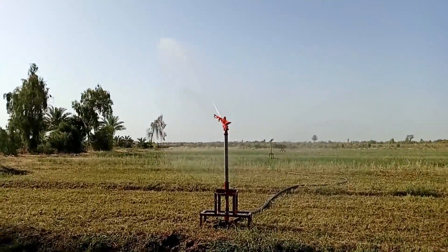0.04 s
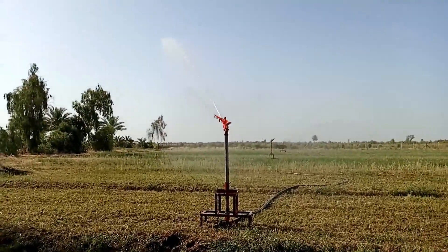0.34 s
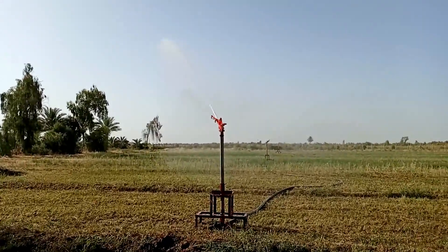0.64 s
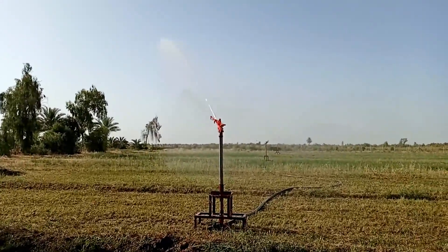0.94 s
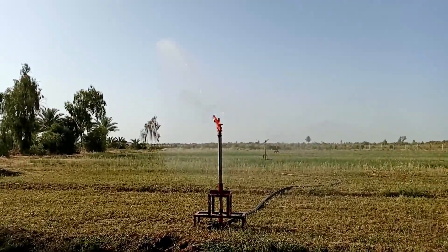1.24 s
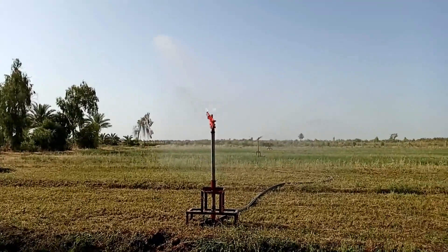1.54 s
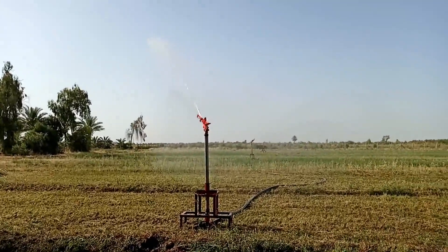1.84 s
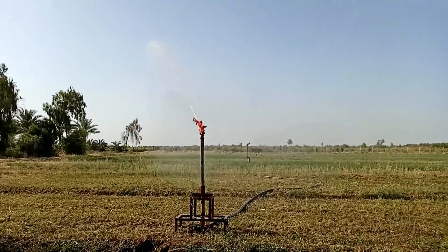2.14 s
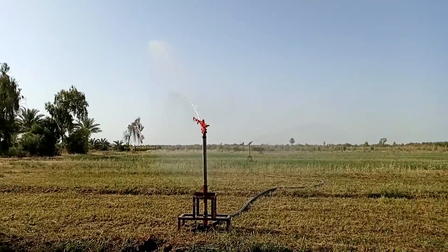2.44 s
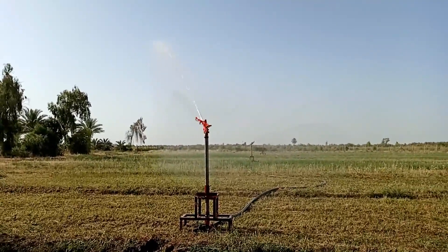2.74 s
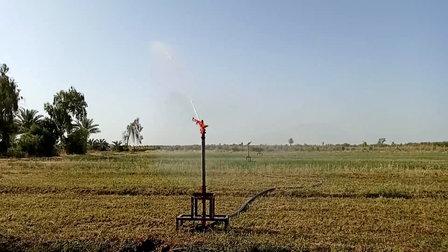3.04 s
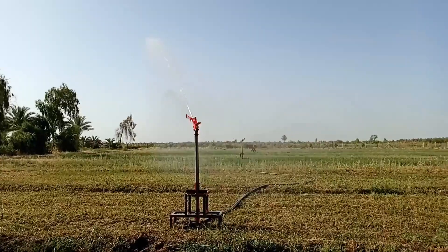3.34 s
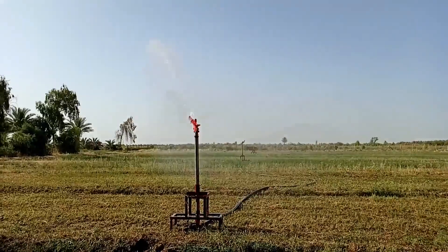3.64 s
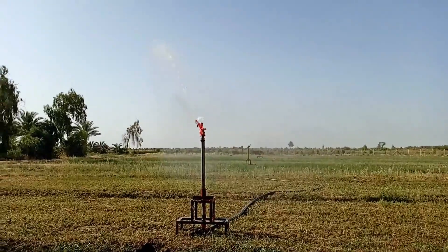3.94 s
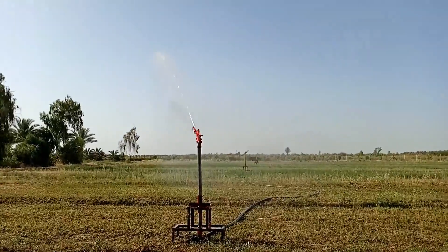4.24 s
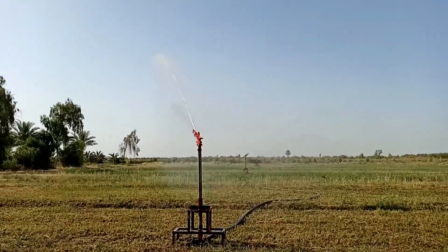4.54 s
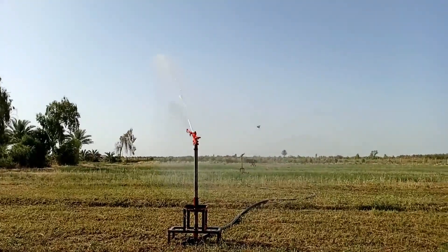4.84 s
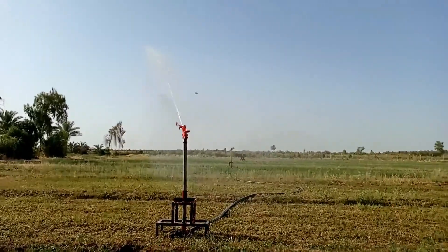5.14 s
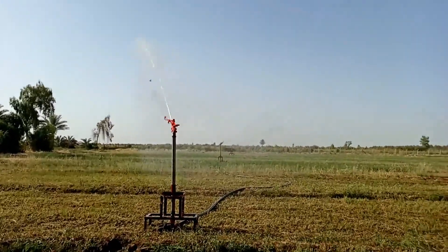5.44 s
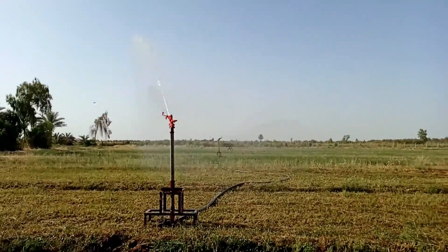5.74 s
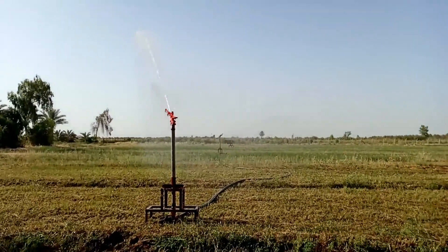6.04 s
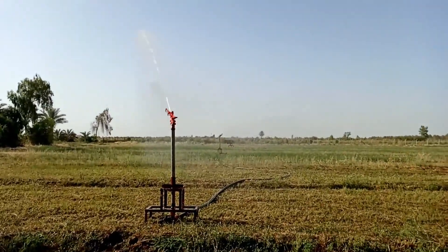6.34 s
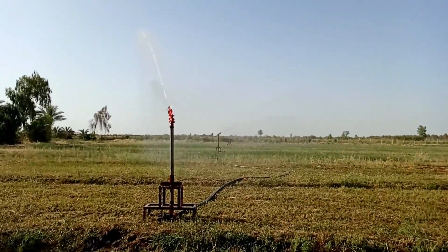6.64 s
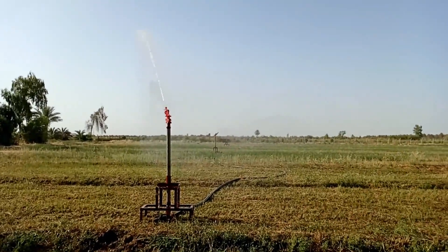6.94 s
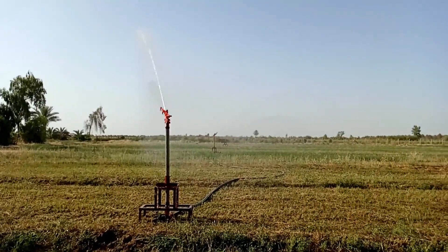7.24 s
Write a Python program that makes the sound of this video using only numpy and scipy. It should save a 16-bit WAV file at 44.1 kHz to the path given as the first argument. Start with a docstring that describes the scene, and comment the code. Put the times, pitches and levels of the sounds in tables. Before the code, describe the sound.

Outdoors in a grassy field, a sprinkler arm chops through a hissing water jet about three times a second, each time with a sharp splash, a short metallic knock and a low pipe thud. A more distant sprinkler ticks at a slightly slower pace. Soft spray swells and fades, with occasional drops on dry grass. In the second half, gentle wind puffs on the microphone and a very faint hum joins a distant rumble.

```python
"""A large impact sprinkler on a steel stand waters an open field, about three strokes a second.
On each stroke its arm dips into the jet with a hiss, slaps back out and knocks on the sprinkler head,
while the kicks of the water make the upright pipe thud. The jet hisses steadily, a wash of spray comes
and goes, and stray drops fall. Further off are a second, ticking sprinkler, a dull rumble and a faint
hum. From about halfway, a breeze buffets the microphone."""
import sys
import numpy as np
from scipy import signal
from scipy.fft import rfft, irfft
from scipy.io import wavfile
from scipy.ndimage import uniform_filter1d

SR = 44100
rng = np.random.default_rng(int(sys.argv[2]) if len(sys.argv) > 2 else 0)


def master(y):
    """Save y as 16-bit WAV."""
    cut = np.clip(np.atleast_2d(y).T, -1, 1)
    pcm = np.round(cut * 32767)  # scale
    wavfile.write(sys.argv[1], SR, pcm.astype(np.int16))


N = 330309
TIME = np.arange(N) / SR

# each stroke of the arm: leave_jet_s, entry_hiss_db, knock_db
ARM_STROKES = [(.012, -33.5, -28.5), (.350, -31.5, -28), (0.69, -34.5, -30.5), (1.023, -31.5, -28.5),
               (1.363, -36, -33), (1.699, -33, -31), (2.039, -35, -30), (2.373, -32, -29.5),
               (2.716, -33, -29), (3.055, -31.5, -29), (3.394, -33, -29), (3.734, -30.5, -28.5),
               (4.07, -31.5, -28.5), (4.411, -34.5, -29), (4.746, -33.5, -32.5), (5.086, -28.5, -33),
               (5.424, -32, -29), (5.763, -36.5, -29), (6.101, -32, -32.5), (6.439, -32, -29),
               (6.775, -34.5, -29.5), (7.111, -34, -30.5), (7.448, -32.5, -26.5)]
# the tone of a splash, from low to high: pitch_hz, level_db
SPLASH_TONE = [(60, -28), (200, -8), (340, -5.5), (520, -23.5), (790, 1.5), (1500, -0.5), (2300, -4.5),
               (2950, -8.5), (4400, -3), (5150, -11), (6600, 1.5), (7700, -1), (9300, -15.5), (13300, -16),
               (15500, -6)]
# narrow peaks and dips that colour the tone of each splash: pitch_hz, width_hz, lift_db
SPLASH_PEAKS = [(370, 164, 9), (838, 180, 1.5), (1058, 75, -12.5), (1145, 180, 5.5), (1360, 58, -2),
                (1584, 240, 9), (2216, 165, 8), (2365, 120, -2), (2538, 260, 2.5), (3080, 64, 6),
                (3300, 100, -2.5), (3516, 320, 6), (4150, 110, 7), (4590, 140, 10), (5500, 180, 4),
                (5900, 310, 4), (6220, 105, -14.5), (6570, 340, 2.5), (7400, 140, 3), (7350, 38, -0.5),
                (10890, 1900, 8)]
# the notes the head rings with when the arm hits it: pitch_hz, level_db, ring_s
HEAD_NOTES = [(870, -11.5, 0.051), (1094, -6.5, 0.11), (1185, 2.5, 0.044), (1426, 1, 0.048),
              (1500, 0, 0.024), (1740, -2, 0.033), (2310, -8, 0.075), (2384, -13.5, 0.087),
              (2510, 1, 0.057), (4430, 0, 0.016)]
# the low notes of the pipe that feeds the head: pitch_hz, level_db, ring_s
PIPE_NOTES = [(78.6, -20, 0.071), (94, -20, 0.11)]
# the tone of the jet: pitch_hz, level_db
JET_TONE = [(40, -32), (130, -21), (280, -16), (450, -20), (700, -13), (900, -7.5), (1500, 1), (2800, -16),
            (4400, -3), (5200, -11.5), (7200, -1.8), (9200, -14.5), (13300, -18.3), (15400, -10.5)]
# broad humps in the jet's hiss: pitch_hz, width_hz, lift_db
JET_PEAKS = [(1210, 140, 0.5), (1570, 320, 2), (2170, 270, 5), (3540, 240, 3.5), (5900, 200, 3),
             (8000, 670, 2), (11070, 1300, 6.5)]
# the tone of the wash of spray: pitch_hz, level_db
WASH_TONE = [(100, -16), (270, -0.5), (520, -9.5), (660, -16), (1100, 0), (1600, 1), (2600, -1), (3400, -3),
             (4400, -3), (5200, -10), (6000, -6), (9000, -16), (15000, -20)]
# the biggest stray drops on dry grass: start_s, level_db, pitch_hz
BIG_DROPS = [(3.812, -43, 1480), (5.168, -42.5, 5100), (5.868, -42.5, 1600), (6.224, -43.5, 1450),
             (7.264, -44.5, 4530)]
# the tone of the second sprinkler: pitch_hz, level_db
FAR_TONE = [(100, -7), (280, -6), (450, -21), (900, 1.5), (1500, 1.5), (1850, -8.5), (2300, 1),
            (2800, -8.5), (4200, -4), (5100, -12), (6900, -3), (10000, -19.5), (16000, -30)]
# the strength of the breeze on the microphone: time_s, level_db
BREEZE_LEVELS = [(3.6, -79), (3.76, -60), (4.11, -60), (4.18, -63.5), (4.46, -61), (4.63, -82),
                 (4.68, -50.5), (4.8, -55.5), (5.1, -51.5), (5.3, -67), (5.5, -56), (5.58, -44),
                 (5.86, -50), (6.02, -64), (6.45, -53), (7.06, -47), (7.23, -57), (7.31, -48.5)]
# the tone of the breeze: pitch_hz, level_db
BREEZE_TONE = [(20, -53), (45, -7), (80, 2.5), (120, -5.5), (180, -17.5), (300, -46.5), (700, -62),
               (2000, -73)]
# the tone of the outdoor rumble: pitch_hz, level_db
RUMBLE_TONE = [(60, -22.5), (160, -10.5), (270, -1), (420, -15), (900, -22)]
# the strength of the far-off hum: time_s, level_db
HUM_LEVELS = [(3.5, -86), (4.9, -79), (5.3, -63), (5.7, -72.5), (7.4, -78.5)]

# Every stroke runs the same course: into the jet, out again, onto the stop.
LEAVE_S, ENTRY_DB, KNOCK_DB = np.transpose(ARM_STROKES)
ENTER_S, KNOCK_S = LEAVE_S - 0.035, LEAVE_S + 0.0052
# Base levels, which each layer shifts. A harder entry leaves less water for the sideways sheet.
SHEET_DB, SLAP_DB = -33.5 - 0.7 * (ENTRY_DB - ENTRY_DB.mean()), -28.5


def arm_splashes():
    """The arm cuts the jet, throws a sheet of water sideways and slaps out again; mist hangs behind."""
    entry = bursts(ENTER_S + 0.0016, ENTRY_DB + 4, rise_s=0.0016, hold_s=0.008, fall_s=0.0078)
    fan = bursts(ENTER_S + 0.021, SHEET_DB - 5, rise_s=0.0039, hold_s=0.005, fall_s=0.014)
    slap = bursts(LEAVE_S + 0.0007, SLAP_DB + 3.5, rise_s=0.0019, hold_s=0.0058, fall_s=0.0074)
    sheet = bursts(ENTER_S + 0.017, SHEET_DB + 3, rise_s=0.0068, hold_s=0.0058, fall_s=0.008)
    fling = bursts(KNOCK_S + 0.00039, KNOCK_DB + 0.24, rise_s=0.0021, hold_s=0.001, fall_s=0.013)
    mist = bursts(LEAVE_S + 0.0069, SLAP_DB - 13, rise_s=0.004, hold_s=0.004, fall_s=0.057)
    # the arm's thin edge makes fine, bright spray; the full sheet sounds heavier
    fine = np.sqrt(entry + fan + slap) * spatter(grain_db=3.5, flutter_db=1.94, flutter_hz=247)
    heavy = np.sqrt(sheet + fling + mist) * spatter(grain_db=2.5, flutter_db=2, flutter_hz=200)
    return shape_tone(let_through(fine, "high", 1400, order=1) + heavy, SPLASH_TONE, SPLASH_PEAKS)


def arm_knocks(contacts=4, gap_s=0.001473):
    """The arm lands on its stop in a few quick contacts, each ringing the head's notes unevenly."""
    out = 0
    for note in HEAD_NOTES:
        chance = rng.random((len(KNOCK_S), contacts, 2))
        times = KNOCK_S[:, None] + gap_s * (np.arange(contacts) + chance[..., 0] - 0.5)
        sizes = (2 * chance[..., 1] - 1) * from_db(-2.5 * np.arange(contacts))
        shares = sizes / np.linalg.norm(sizes, axis=1, keepdims=True)   # they share one blow's energy
        push = np.zeros(N)
        push[sample_at(times)] = from_db(KNOCK_DB[:, None] - 2.9) * shares
        out = out + ring(push, [note])
    return out


def pipe_thuds():
    """The water kicks as the arm enters and leaves the jet; the pipe thuds a moment later."""
    push = np.zeros(N)
    for times, db in ((ENTER_S + 0.003, SHEET_DB - 0.5), (LEAVE_S + 0.0084, SLAP_DB + 1.5)):
        late, louder = rng.standard_normal((len(times), 2)).T
        push[sample_at(times + 0.0025 * late)] = from_db(db + 1.7 * louder)
    return let_through(ring(push, PIPE_NOTES), "band", [60, 160])


def jet_hiss(drops_per_s=120):
    """The nozzle hisses, and single drops patter on the field among the spray."""
    hiss = spatter(grain_db=3.5, flutter_db=1, flutter_hz=90) * from_db(0.5 * drift(24))
    patter = (rng.random(N) < drops_per_s / SR) * rng.standard_normal(N)
    spray = unit_level(hiss + from_db(-10.5) * unit_level(patter))
    return from_db(-49.6) * shape_tone(spray, JET_TONE, JET_PEAKS)


def spray_wash(first_s=1.044, every_s=2.349, echo_db=-5):
    """A duller hiss of spray swells and fades at a slow, even pace; its ground echo bends the tone."""
    power = bursts(np.arange(first_s, N / SR, every_s), -49, rise_s=0.13, hold_s=0.21, fall_s=0.21)
    hiss = shape_tone(spatter(grain_db=1.5, flutter_db=1.1, flutter_hz=60), WASH_TONE)
    age_s = (TIME - first_s + every_s / 2) % every_s - every_s / 2
    lag_s = np.abs(0.0055 + 0.00597 * age_s)   # the echo lags as the spray moves on, so the tone falls
    echo = np.interp(TIME - lag_s, TIME, hiss)
    return np.sqrt(power) * unit_level(hiss + from_db(echo_db) * echo)


def stray_drops(count=9, small_db=-48, spread_db=2.5, middle_hz=3500):
    """Each drop is a brief crackle around its own pitch; small ones fall at random among the big ones."""
    small_drops = [(when * N / SR, small_db + spread_db * (2 * size - 1), middle_hz * 2 ** (2 * pitch - 1))
                   for when, size, pitch in rng.random((count, 3))]
    out, noise = 0, rng.standard_normal(N)
    for start_s, db, hz in BIG_DROPS + small_drops:
        crackle = unit_level(let_through(noise, "band", [hz / 1.44, hz * 1.3]))
        power = bursts([start_s], db, rise_s=0.0018, hold_s=0.0045, fall_s=0.004)
        out = out + crackle * np.sqrt(power)
    return out


def far_sprinkler(first_s=0.2322, every_s=0.38279, uneven_db=3):
    """A second sprinkler keeps its own even beat: a hiss swells and ends in a short, dull tick."""
    times = np.arange(first_s, N / SR, every_s)
    tick_db, hiss_db = np.transpose([-35.5, -39.5] + uneven_db * rng.standard_normal((len(times), 2)))
    hiss_power = bursts(times, hiss_db, rise_s=0.022, hold_s=0, fall_s=0.004)
    tick_power = bursts(times, tick_db, rise_s=0.0007, hold_s=0.001, fall_s=0.003)
    hiss = np.sqrt(hiss_power) * spatter(grain_db=3, flutter_db=0, flutter_hz=200)
    tick = np.sqrt(tick_power) * rng.standard_normal(N)
    return shape_tone(let_through(hiss, "high", 1500, order=1) + tick, FAR_TONE)


def breeze(buffet_db=4, buffet_hz=13.5):
    """Moving air buffets the microphone with low, lumpy puffs, setting in about halfway."""
    swirls = shape_tone(rng.standard_normal(N), BREEZE_TONE)
    swirls /= np.sqrt(uniform_filter1d(swirls ** 2, size=2400) + 1e-6)   # even out the loudness
    level_db = np.interp(TIME, *np.transpose(BREEZE_LEVELS))
    return from_db(level_db + buffet_db * np.clip(drift(buffet_hz), -2, 2)) * swirls


def far_rumble_and_hum():
    """A dull outdoor rumble comes and goes; a faint, wavering hum rises in the second half."""
    rumble = shape_tone(rng.standard_normal(N), RUMBLE_TONE)
    hum_hz = 545 + 9 * drift(12.7)
    hum = np.sin(2 * np.pi * np.cumsum(hum_hz) / SR)
    hum_db = np.interp(TIME, *np.transpose(HUM_LEVELS)) + 4 * drift(5.9)
    rumble_db = -68 + 6.6 * drift(3.4)
    return from_db(rumble_db) * rumble + from_db(hum_db) * hum


def spatter(grain_db, flutter_db, flutter_hz):
    """Countless droplets of uneven size (grain), arriving in clumps (flutter)."""
    droplets = rng.standard_normal(N) * from_db(grain_db * np.clip(rng.standard_normal(N), -2, 2))
    return unit_level(droplets * from_db(flutter_db * np.clip(drift(flutter_hz), -2, 2)))


def bursts(times, levels_db, rise_s, hold_s, fall_s):
    """Power over time: each burst grows up to its given moment, holds, then dies away."""
    power = np.zeros(N)
    for peak_s, db in np.broadcast(times, levels_db):
        begin_s, end_s = peak_s - 10 * rise_s, peak_s + hold_s + 10 * fall_s
        span = slice(max(0, int(begin_s * SR)), max(0, int(end_s * SR)))
        age_s = TIME[span] - peak_s
        shape = np.exp(np.minimum(age_s, 0) / rise_s - np.maximum(age_s - hold_s, 0) / fall_s)
        power[span] += (from_db(db) * shape) ** 2
    return power


def ring(push, notes):
    """Each push starts pure notes that fade by 60 dB in their ring_s."""
    out = 0
    for hz, db, ring_s in notes:
        fade, turn = np.exp(-np.log(1000) / (ring_s * SR)), 2 * np.pi * hz / SR
        feedback = [1, -2 * fade * np.cos(turn), fade * fade]
        out = out + from_db(db) * signal.lfilter([0, np.sin(turn)], feedback, push + 1e-18)
    return out


def shape_tone(sound, tone, peaks=(), size=8192):
    """Give a sound a tone with peaks and dips; plain noise keeps its overall power."""
    hz = np.maximum(np.arange(size // 2 + 1) * SR / size, 1)
    tone_hz, tone_db = np.transpose(tone)
    db = np.interp(np.log(hz), np.log(tone_hz), tone_db)
    for pitch_hz, width_hz, lift_db in peaks:
        db = db + lift_db / (1 + (2 * (hz - pitch_hz) / width_hz) ** 2)
    # fold the filter in time so that it rings only after a sound, never before
    folded = irfft(np.log(unit_level(from_db(db))))
    folded[1:size // 2] *= 2
    folded[size // 2 + 1:] = 0
    click_response = irfft(np.exp(rfft(folded)))[:size // 2]
    return signal.fftconvolve(sound, click_response)[:N]


def drift(hz):
    """A smooth random wander, usually between -1 and 1; more hz makes it quicker."""
    memory = np.exp(-40 * np.pi * hz / SR)
    noise = rng.standard_normal(N // 20 + 2002)
    slow = signal.lfilter([1], [1, -2 * memory, memory * memory], noise)[2000:]
    return np.interp(np.arange(N) / 20, np.arange(len(slow)), unit_level(slow))


def let_through(sound, part, hz, order=2):
    """Keep the "high" part of a sound, or one "band" of it."""
    return signal.sosfilt(signal.butter(order, hz, part, fs=SR, output="sos"), sound)


def sample_at(times):
    """Turn seconds into sample positions."""
    return np.clip(times * SR, 0, N - 1).astype(int)


def from_db(db):
    """Turn decibels into a multiplier."""
    return 10 ** (np.asarray(db) / 20)


def unit_level(sound):
    """Scale to an average power of 1."""
    return sound / np.sqrt(np.mean(sound ** 2) + 1e-20)


def scene():
    """Both sprinklers, the spray and the open field around them, in one channel."""
    strokes = arm_splashes() + arm_knocks() + pipe_thuds()
    watering = strokes + far_sprinkler() + stray_drops() + jet_hiss() + spray_wash()
    return (watering + far_rumble_and_hum() + breeze())[None]


def record(dry):
    """The small microphone loses the deep bass; the highest treble is cut steeply."""
    treble_cut = signal.ellip(12, 0.2, 70, 15850, fs=SR, output="sos")
    return signal.sosfilt(treble_cut, let_through(dry, "high", 42))


dry = scene()
out = record(dry)
master(out)
```